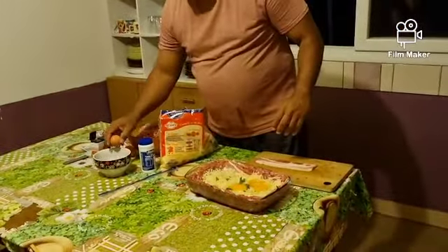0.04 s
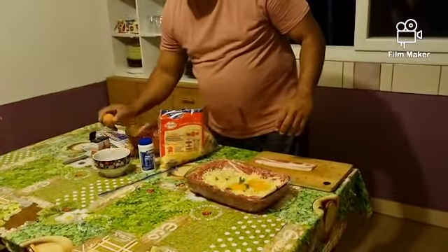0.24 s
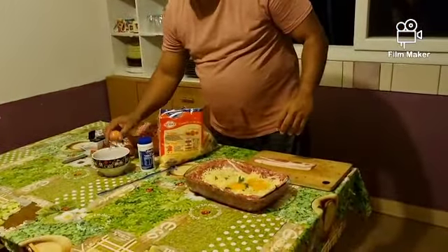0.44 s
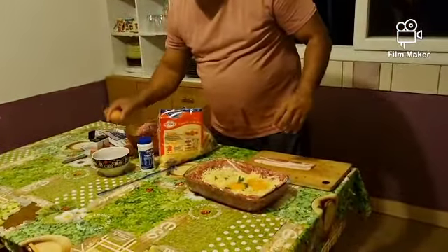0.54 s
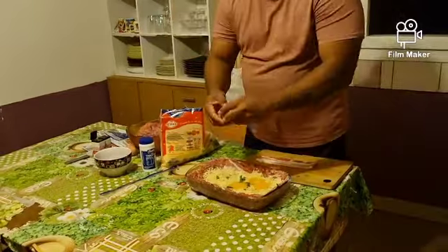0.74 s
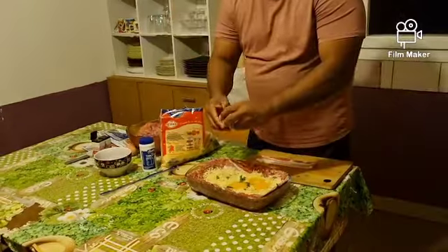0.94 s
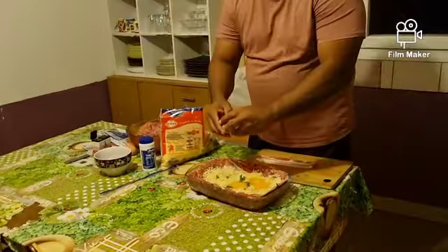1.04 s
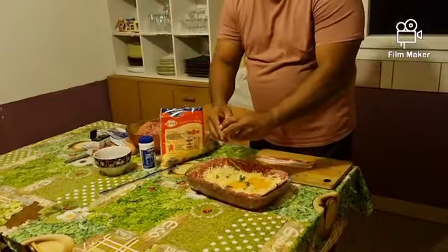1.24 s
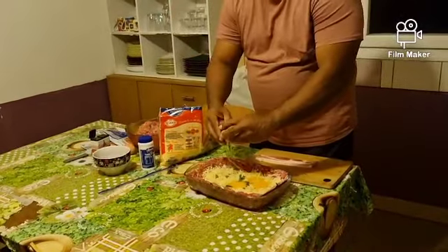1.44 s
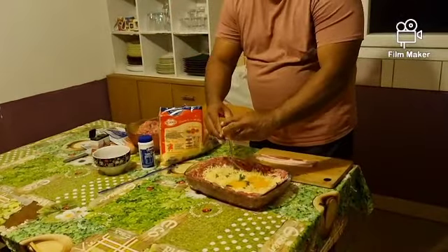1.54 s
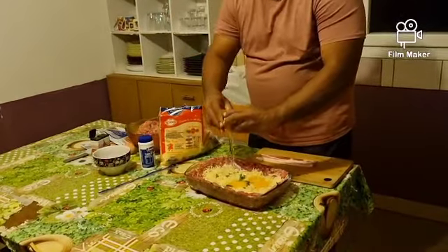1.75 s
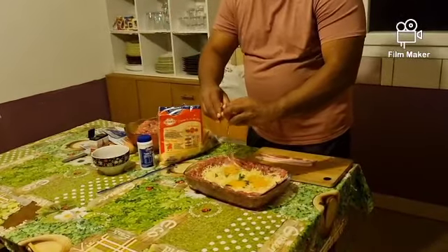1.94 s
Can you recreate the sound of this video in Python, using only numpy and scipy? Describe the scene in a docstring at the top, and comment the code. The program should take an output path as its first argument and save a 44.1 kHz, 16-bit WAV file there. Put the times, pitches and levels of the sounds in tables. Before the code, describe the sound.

An egg is knocked once on a ceramic bowl, which rings and rocks, then its shell crunches open

```python
"""Over a low appliance hum and room air, a faint squeak swells as an egg is knocked on a ceramic bowl.
The bowl rings as decaying sine tones, then rocks back on the table in thumps of filtered noise and tones.
About a second in, the shell is crunched open in short noise bursts, each with a brief ringing tone.
Light ticks and hollow shell taps follow, then two thin squeaks of wavering pitch and one last tick.
The kitchen is small and lively, its echoes made of fading noise; a phone hears it a metre or two away."""
import sys
import numpy as np
from scipy import signal
from scipy.fft import rfft, irfft
from scipy.io import wavfile
from scipy.ndimage import uniform_filter1d

SR = 44100
rng = np.random.default_rng(int(sys.argv[2]) if len(sys.argv) > 2 else 0)


def int16_out(signal):
    """Quantize to a 16-bit WAV file."""
    q = np.round(np.clip(np.atleast_2d(signal).T, -1, 1) * 32767)
    wavfile.write(sys.argv[1], SR, q.astype(np.int16))


N = 88200  # samples: two seconds

# In all tables T60 is the time to fade by 60 dB, and levels are before the room and left/right balance.
# Every "colour" table is a spectrum: only the differences between its levels per Hz matter.

# Kitchen echoes, band by band: [f/Hz, T60/s, level/dB]
ROOM_BANDS = [(102, 0.37, -34), (288, 0.42, 6), (940, 0.39, -1.5), (2960, 0.3, 1.5), (5950, 0.36, 2),
              (14000, 0.27, 5.5)]
ROOM_GAP_S, ROOM_BUILD_S = 0.0013, 0.0018  # wait before the echoes, then their build-up time
ROOM_WIDE_HZ, AIR_WIDE_HZ = 455, 556  # below these the two sides grow alike
LEFT_LAG_S, LEFT_MINUS_RIGHT_DB = 0.00038, -2.5
BASS_CUT_HZ, TREBLE_CUT_HZ = 71.5, 15850
CONTACT_RISE_S = 0.00047
GRAIN_ROUGH = 0.7  # unevenness of shell noise: spread of the natural log of loudness

# Appliance hum tones, before their slow wavering: [f/Hz, rms level/dB]
HUM_TONES = [(50, -58.5), (66.5, -50), (97, -59)]
HUM_WAVER_DB, HUM_DRIFT_HZ = 1.5, 2.05  # typical wander of level and pitch
# Colour of the room air: [f/Hz, level per Hz/dB]
AIR_COLOUR = [(15, -19), (25, -14), (38, -39), (48, -3), (70, -2.5), (111, -16), (127, -25.5), (200, -18.5),
              (344, -14), (427, -25), (489, -15), (624, -22.5), (775, -21), (1020, -26), (3160, -31.5),
              (6210, -38.5), (7310, -43), (13600, -45), (16000, -46)]
AIR_DB = -53.5

# Squeaks of rubbed shell, before their level wavers: [centre t/s, length/s, f/Hz, level/dB, pitch wander/Hz]
SQUEAKS = [(0.2, 0.17, 3223, -59, 80), (0.332, 0.044, 3312, -39.5, 21), (1.691, 0.044, 3186, -50.5, 150),
           (1.738, .06, 3116, -55, 61)]

# Light shell ticks: [t/s, level/dB, fade/s]
TICKS = [(1.2964, -50, 0.005), (1.4474, -43.5, 0.0019), (1.894, -41, 0.00079)]
# Colour of a tick: [f/Hz, level per Hz/dB]
TICK_COLOUR = [(500, -46), (2000, 5), (3600, 3.5), (6000, 3), (7500, -7), (9500, 6), (11000, -8),
               (16000, -5.5)]
TICK_WET_DB = -1.5

# Taps of hollow shell, levels relative: [t/s, level/dB]
TAPS = [(1.447, -11), (1.473, -7.5), (1.5993, -1.5), (1.6175, 0)]
# Colour of the tap noise: [f/Hz, level per Hz/dB]
TAP_COLOUR = [(500, -9), (1200, -12), (1700, 12), (2400, -6.5), (3300, 4.5), (4400, -3.5), (6300, 3),
              (7500, -12.5), (9200, -7), (11000, -16), (16000, -12.5)]
# Ringing tones of the hollow shell, levels relative: [f/Hz, level/dB, T60/s]
HOLLOW_MODES = [(1630, 6, 0.19), (1712, -12, 0.081), (1750, -4, 0.1), (2900, -9.5, .1), (3560, -4, .14),
                (6020, -5.5, 0.1)]
TAP_DB, TAP_FADE_S, HOLLOW_DB = -37, 0.0025, -50.5

# Shell cracks: [t/s, level/dB, fade/s, treble tilt/(dB per octave), fragment f/Hz, fragment relative level/dB]
CRACKS = [(1.0102, -38.5, 0.0049, 8.5, 9150, -3.5), (1.0144, -37.5, 0.0066, -5, 3360, 5),
          (1.0222, -40.5, 0.0021, 4.5, 9740, -4), (1.038, -46, 0.0052, -6.5, 3640, -6),
          (1.065, -39, 0.004, 2.5, 2807, -0.5)]
# Colour of a crack before its tilt: [f/Hz, level per Hz/dB]
CRACK_COLOUR = [(300, -18), (750, -7), (1500, 1), (2200, -5), (3300, 2.5), (4200, 4.5), (5000, 1),
                (6300, -3.5), (7600, -9), (9500, -6.5), (11000, -11.5), (13500, -10), (16000, -15.5)]
FRAGMENT_T60_S = 0.022

# Thumps of the rocking bowl, levels relative: [t/s, level/dB]
THUMPS = [(0.2753, 0), (0.2872, -2.5), (.332, -10), (.413, -24)]
# Ringing tones of the table, levels relative: [f/Hz, level/dB, T60/s]
TABLE_MODES = [(88, -8.5, 0.28), (171, -4.5, 0.24), (198, -3.5, 0.14), (241.5, -9, 0.22), (276.7, 1.5, 0.3),
               (372, -7, 0.32), (501.7, -10.5, 0.21), (784, -8.5, 0.11)]
# Colour of the dull thud noise: [f/Hz, level per Hz/dB]
THUD_COLOUR = [(30, -51), (60, -40), (150, 0), (330, -1), (600, -6), (1200, -28.5), (3000, -41)]
TABLE_DB, TABLE_WET_DB, THUD_DB, THUD_FADE_S = -27.5, -12, -27, 0.018

# Colour of the knock noise: [f/Hz, level per Hz/dB]
KNOCK_COLOUR = [(71, -58), (120, -3.5), (355, -6), (503, -21.5), (805, -6), (1010, -13.5), (1400, -2),
                (2200, -19.5), (3310, -16), (5870, -17.5), (7820, -27.5), (8840, -22), (10800, -35),
                (12000, -27), (16000, -31)]
KNOCK_S, KNOCK_DB, KNOCK_FADE_S = 0.2108, -17.5, 0.0076
# Ringing tones of the bowl, levels relative: [f/Hz, level/dB, T60/s]
BOWL_MODES = [(1390, 1, 0.22), (1376, -1, 0.061), (1750, -10, 0.17), (2444, -16.5, 0.21), (3346, -5, 0.34),
              (3390, -15.5, 0.51), (4920, -28, 0.16), (5090, -10, .18), (5900, -13.5, .16),
              (8600, -16, 0.26), (12300, -13, .13), (13660, -10, .13), (15480, -20, .15)]
BOWL_DB, BOWL_WET_DB = -24, -7.5


def undb(db):
    """Turn decibels into a gain."""
    return 10 ** (np.asarray(db) / 20)


def clock():
    """Give the time of each sample in seconds."""
    return np.arange(N) / SR


def unit(x):
    """Scale to an rms (average strength) of 1."""
    return x / np.sqrt(np.mean(x ** 2))


def shape(x, gain):
    """Filter with the given gain at each frequency, never responding before the sound arrives."""
    # Folding this transform of the log gain onto positive times makes the filter causal.
    cepstrum = irfft(np.log(gain))
    cepstrum[1:N // 2] *= 2
    cepstrum[N // 2 + 1:] = 0
    return irfft(rfft(x) * np.exp(rfft(cepstrum)))


def colour(x, points):
    """Filter through (f/Hz, level/dB) points, keeping the power of white noise."""
    hz, db = np.array(points).T
    f = np.fft.rfftfreq(N, 1 / SR) + 1  # 1 Hz up, to avoid log(0)
    levels = np.interp(np.log(f), np.log(hz), db)
    return shape(x, unit(undb(levels)))


def walk(rate):
    """Wander slowly at random with an rms of 1, from about `rate` new values a second."""
    hold = int(SR / rate)
    steps = np.repeat(rng.standard_normal(N // hold + 1), hold)
    smooth = uniform_filter1d(uniform_filter1d(steps, hold), hold)
    return unit(smooth[:N])


def burst(start, fade, rough):
    """A contact: dense, uneven micro-clicks with an even spectrum that rise quickly and die away."""
    age = clock() - start
    unevenness = np.repeat(rng.standard_normal(N // 20 + 1), 20)[:N]
    grains = rng.standard_normal(N) * np.exp(rough * unevenness)
    x = grains * np.clip(age / CONTACT_RISE_S, 0, 1) * np.exp(-np.abs(age) / fade)
    power = uniform_filter1d(np.abs(rfft(x)) ** 2, size=200)
    even = shape(x, power ** -0.5)
    return even * np.sqrt(fade * SR / 2 / np.sum(even ** 2))  # total energy set by the fade


def ring(start, modes):
    """One blow sets off several sine tones, each fading at its own speed."""
    age = np.maximum(clock() - start, 0)
    x = 0
    for hz, db, t60 in modes:
        fading = np.exp(-np.log(1000) * age / t60)
        x = x + undb(db) * np.sin(2 * np.pi * hz * age) * fading
    return x


def ports(x):
    """Direct sound reaches the left microphone slightly later than the right."""
    t = clock()
    lag = round(LEFT_LAG_S * SR) / SR  # whole samples
    left = np.interp(t - lag, t, x)
    return np.array([left, x])


def kitchen():
    """Stereo room response: diffuse echoes die away band by band, the deep bass alike on both sides."""
    t, f = clock(), np.fft.rfftfreq(N, 1 / SR) + 1
    mid, side = rfft(rng.standard_normal((2, N)))
    width = f / np.hypot(f, ROOM_WIDE_HZ)
    noise = (mid + width * np.array([side, -side])) / np.hypot(1, width)
    centres = np.log([band[0] for band in ROOM_BANDS])
    build = 1 - np.exp(-np.maximum(t - ROOM_GAP_S, 0) / ROOM_BUILD_S)
    echoes = 0
    # Neighbouring bands crossfade, so their shares always add up to 1.
    for share, (hz, t60, db) in zip(np.eye(len(ROOM_BANDS)), ROOM_BANDS):
        envelope = build * np.exp(-np.log(1000) * t / t60)
        band = irfft(noise * np.interp(np.log(f), centres, share))
        echoes = echoes + undb(db) * band * envelope / np.sqrt(np.sum(envelope ** 2))
    return echoes


def place(x, room, wet_db):
    """Add the room's echoes to the direct sound."""
    echoes = signal.fftconvolve(x[None], room, axes=1)[:, :N]
    return ports(x) + undb(wet_db) * echoes


def background():
    """A hum of sine tones wavers in level and pitch over noisy air whose deep bass is alike on both sides."""
    hum = 0
    for hz, db in HUM_TONES:
        cycles = np.cumsum(hz + HUM_DRIFT_HZ * walk(rate=8.02)) / SR + rng.random()
        level = undb(db + HUM_WAVER_DB * walk(rate=5.02))
        hum = hum + level * np.sqrt(2) * np.sin(2 * np.pi * cycles)
    mid, side = (colour(rng.standard_normal(N), AIR_COLOUR) for _ in range(2))
    f = np.fft.rfftfreq(N, 1 / SR)
    side = irfft(rfft(side) * f / np.hypot(f, AIR_WIDE_HZ))
    return ports(hum) + undb(AIR_DB) * (mid + np.array([side, -side]))


def squeaks(room):
    """Rubbing shell gives a thin, unsteady tone that swells and fades."""
    t, x = clock(), 0
    for centre, length, hz, db, wander_hz in SQUEAKS:
        phase = 2 * np.pi * np.cumsum(hz + wander_hz * walk(rate=300)) / SR
        level = undb(db + 3.3 * walk(rate=120))
        swell = np.exp(-(2 * (t - centre) / length) ** 2)
        x = x + level * np.sin(phase) * swell
    return place(x, room, wet_db=-9)


def shell_ticks(room):
    """Small splinters give way one by one, each a short burst of clicks."""
    x = sum(undb(db) * burst(start, fade, GRAIN_ROUGH) for start, db, fade in TICKS)
    return place(colour(x, TICK_COLOUR), room, TICK_WET_DB)


def shell_taps(room):
    """The hollow halves tap together: a short noise, then a brief ring."""
    x = 0
    for start, db in TAPS:
        tap = undb(TAP_DB) * colour(burst(start, TAP_FADE_S, GRAIN_ROUGH), TAP_COLOUR)
        hollow = undb(HOLLOW_DB) * ring(start, HOLLOW_MODES)
        x = x + undb(db) * (tap + hollow)
    return place(x, room, wet_db=1.5)


def shell_cracks(room):
    """Thumbs crunch the shell open; each breaking piece rings for a moment."""
    x = 0
    for start, db, fade, tilt, hz, ring_db in CRACKS:
        tilted = [(f, level + tilt * np.log2(f)) for f, level in CRACK_COLOUR]
        snap = colour(burst(start, fade, GRAIN_ROUGH), tilted)
        fragment = ring(start, [(hz, ring_db, FRAGMENT_T60_S)])
        x = x + undb(db) * (snap + fragment)
    return place(x, room, wet_db=1.0)


def rocking(room):
    """The bowl drops back on the cloth-covered table in shrinking thumps: dull noise and table tones."""
    x = 0
    for start, db in THUMPS:
        table = undb(TABLE_DB) * ring(start, TABLE_MODES)
        thud = undb(THUD_DB) * colour(burst(start, THUD_FADE_S, rough=0.52), THUD_COLOUR)
        x = x + undb(db) * (table + thud)
    return place(x, room, TABLE_WET_DB)


def knock(room):
    """The shell breaks on the rim in a burst of noise, and the same blow makes the bowl ring."""
    crack = undb(KNOCK_DB) * colour(burst(KNOCK_S, KNOCK_FADE_S, rough=0.38), KNOCK_COLOUR)
    bowl = undb(BOWL_DB) * ring(KNOCK_S, BOWL_MODES)
    return place(crack, room, wet_db=1.0) + place(bowl, room, BOWL_WET_DB)


def scene():
    """Mix all sources in the kitchen, a little louder on the right."""
    room = kitchen()
    mix = background() + squeaks(room) + shell_ticks(room) + shell_taps(room)
    mix = mix + shell_cracks(room) + rocking(room) + knock(room)
    balance_db = np.array([[LEFT_MINUS_RIGHT_DB], [-LEFT_MINUS_RIGHT_DB]]) / 2
    return mix * undb(balance_db)


def record(dry):
    """The phone cuts the deepest bass gently and the top of the treble steeply."""
    bass_cut = signal.butter(2, BASS_CUT_HZ, "high", fs=SR, output="sos")
    treble_cut = signal.ellip(10, 0.2, 70, TREBLE_CUT_HZ, fs=SR, output="sos")  # ripple, rejection in dB
    return signal.sosfilt(treble_cut, signal.sosfilt(bass_cut, dry))


dry = scene()
out = record(dry)
int16_out(out)
```